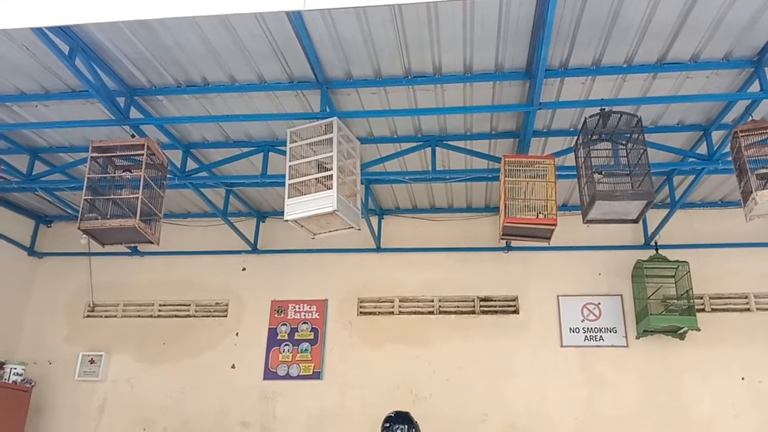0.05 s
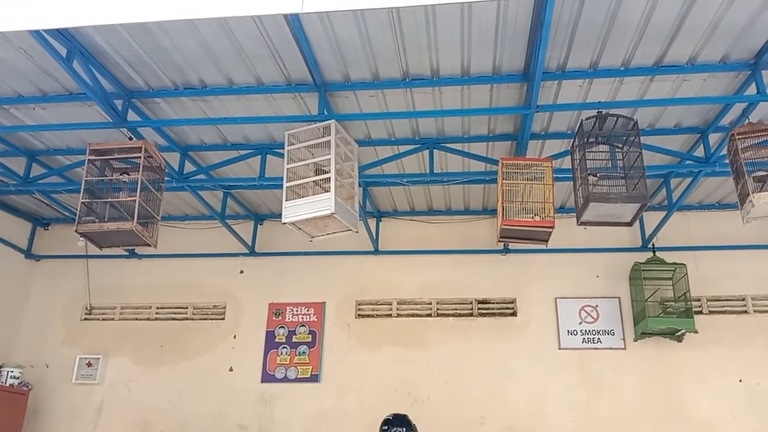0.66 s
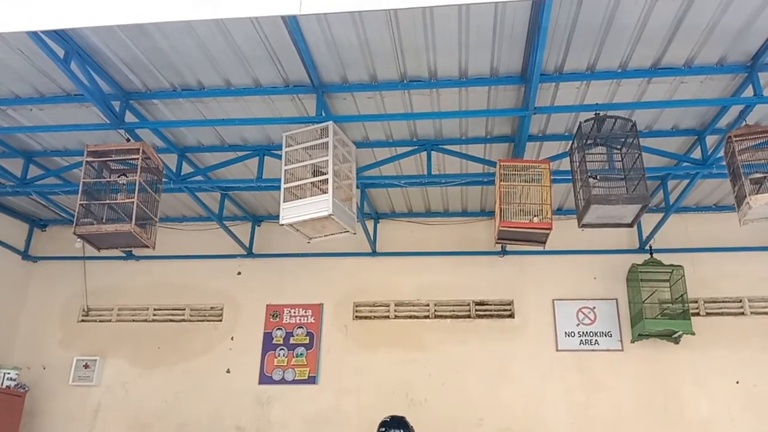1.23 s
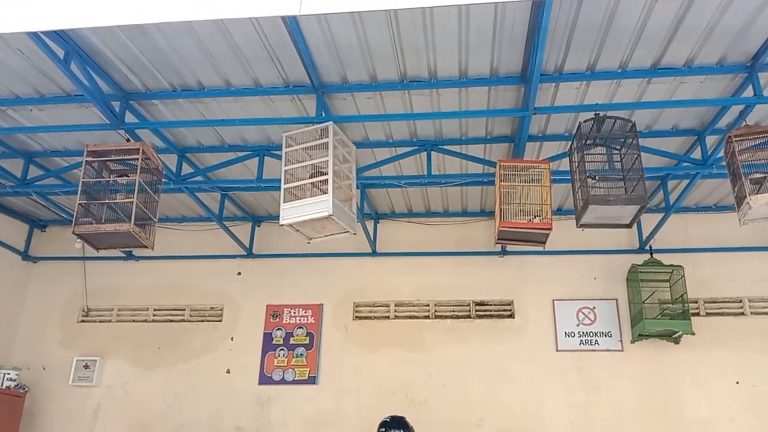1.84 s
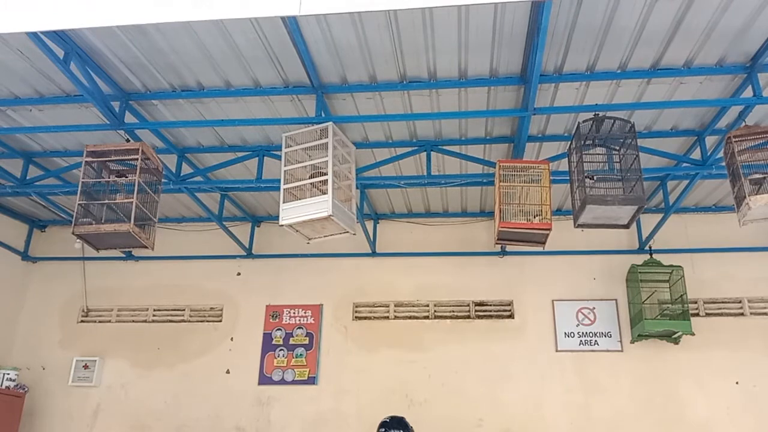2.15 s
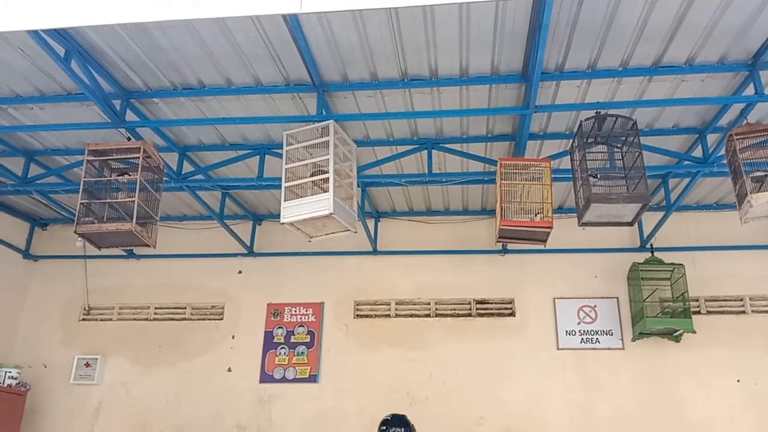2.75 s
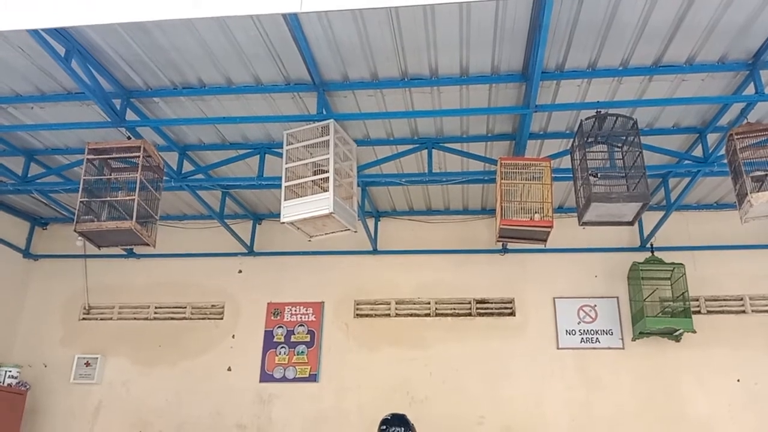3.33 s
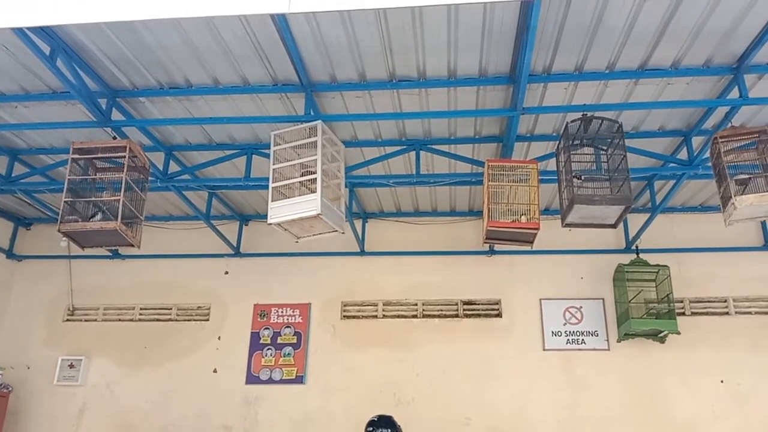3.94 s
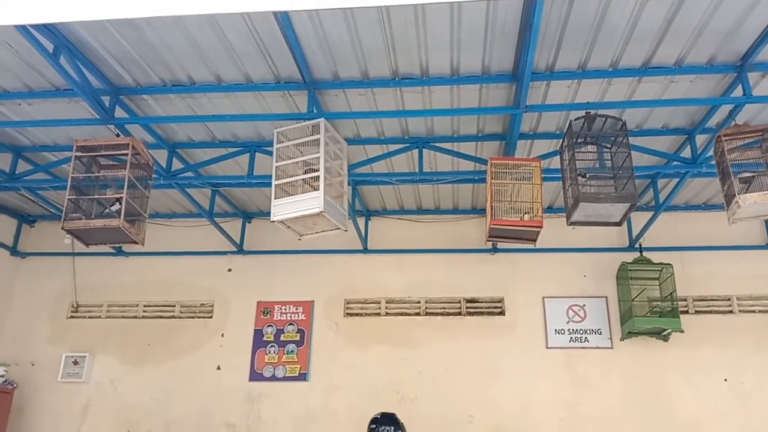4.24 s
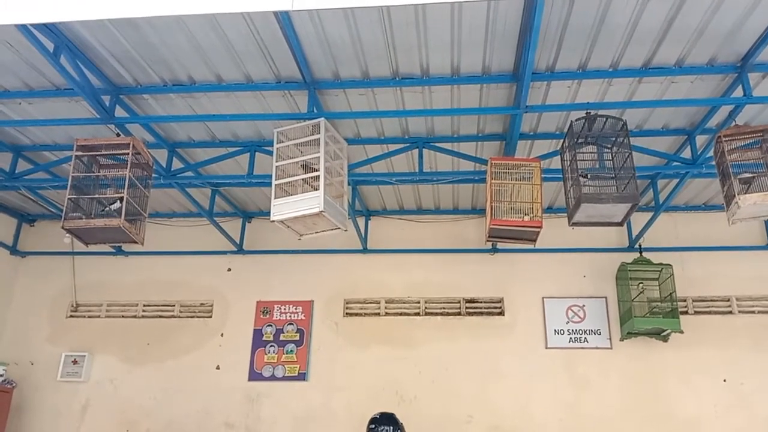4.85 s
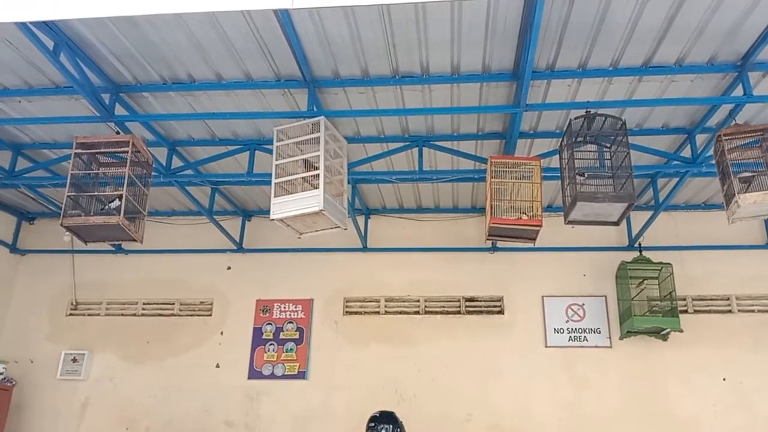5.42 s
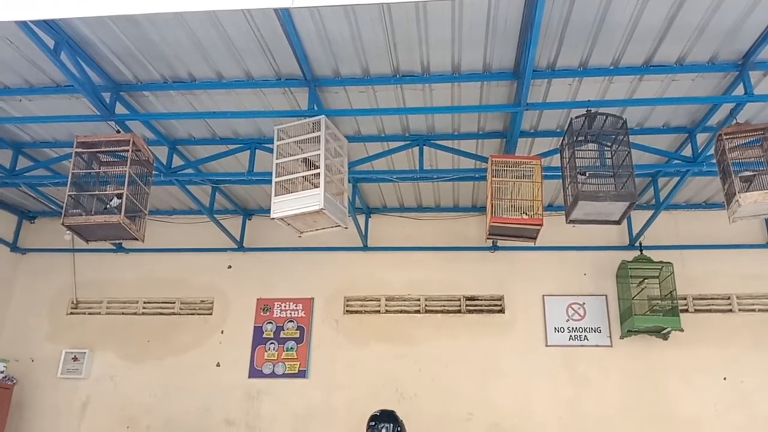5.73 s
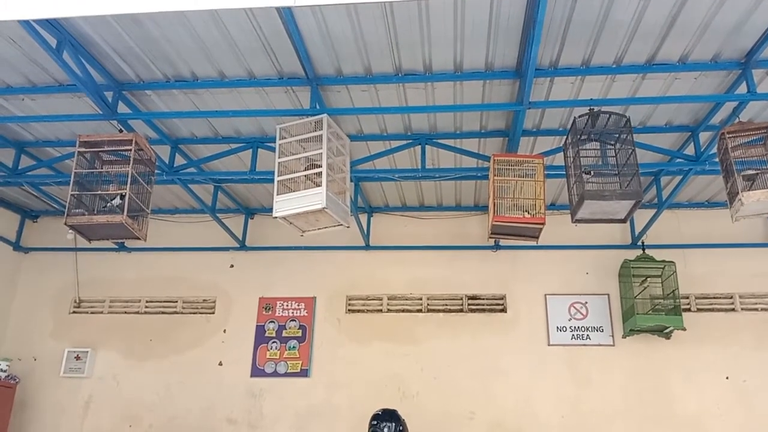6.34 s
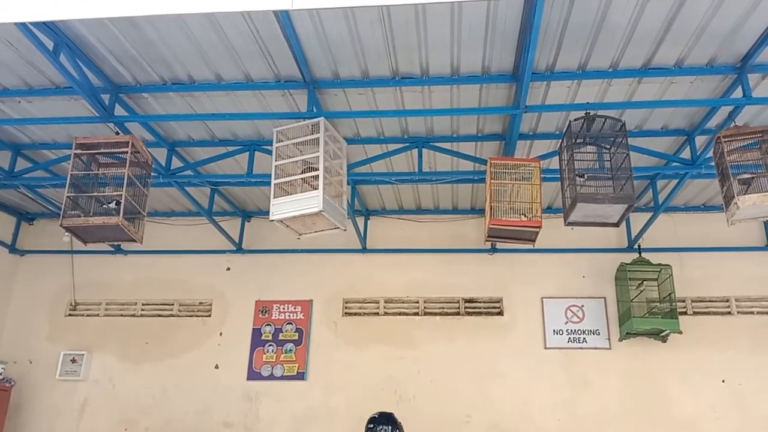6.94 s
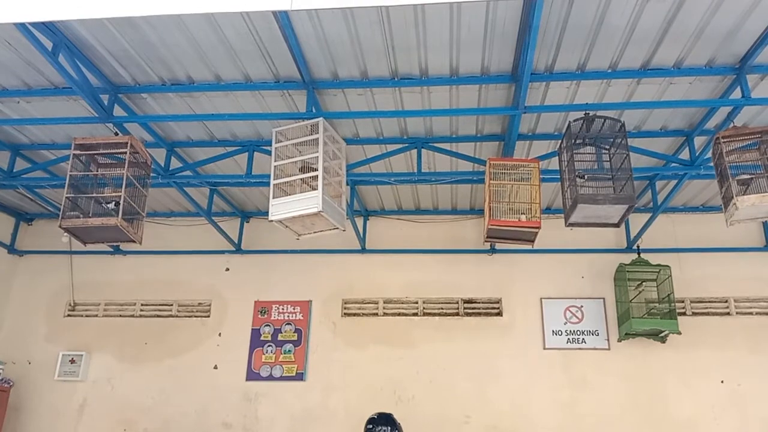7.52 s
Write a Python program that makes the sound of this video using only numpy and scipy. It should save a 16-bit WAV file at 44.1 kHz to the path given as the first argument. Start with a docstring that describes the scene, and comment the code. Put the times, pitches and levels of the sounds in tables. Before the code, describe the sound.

Inside an echoing, metal-roofed shed, a nearby caged bird repeats a short grating rattle that swells into a loud rasp. After five of these calls it lets out a hissing, climbing screech, then rasps twice more and ends on a faint falling squeal. The gaps are very quiet, holding only soft hiss, far chirps, a few light brushes on the cage bars and patches of distant engine hum.

```python
"""A caged songbird scolds near the microphone, in a hard shed that rings under its sheet-metal roof.
From the start a far engine hums in patches through the recorder's noise suppressor, with faint low tones
and chirps. Five calls come first, each a soft churr bursting into a harsh rasp as the membranes of the
syrinx slap. Near 5 s a call breaks into a rising screech. Two more calls follow, the engine slows after
6 s, and a thin squeal falls away at the end. All along, the suppressor turns the gaps down."""
import sys
import numpy as np
from scipy import signal
from scipy.fft import rfft, irfft, next_fast_len
from scipy.io import wavfile
from scipy.ndimage import uniform_filter1d, map_coordinates

SR = 44100
rng = np.random.default_rng(int(sys.argv[2]) if len(sys.argv) > 2 else 0)


def to_wav(sig):
    """Store sig (one row per channel, or 1-D mono) as 16-bit WAV at the path in sys.argv[1].

    Samples outside -1..1 are clipped; the rate is SR.
    """
    pcm = np.clip(np.atleast_2d(sig), -1, 1) * 32767
    pcm = np.round(pcm).astype(np.int16)
    wavfile.write(sys.argv[1], SR, pcm.T)  # frames by channels


N = 338688
T = np.arange(N) / SR

# Background hiss as the noise suppression leaves it. Each row: time in seconds, level in dB.
HISS_LEVEL = [(0, -56.5), (.6, -57), (1.2, -63), (2.1, -61), (2.8, -55.5), (4.9, -60.5), (6.5, -56.5),
              (7.68, -63.5)]
# Spectrum of that hiss. Each row: frequency in Hz, relative level in dB.
HISS_COLOUR = [(100, -32), (400, -33.5), (700, -17), (1400, -13), (2300, -4), (3300, -14.5), (4500, 0.5),
               (6000, 0), (8500, -9), (9700, -22), (12500, -17), (15000, -25.5)]
# Speed of the far engine. Each row: time in seconds, firings per second.
FIRING_RATE = [(0, 42.6), (3, 43.6), (5.6, 44.3), (6.1, 44.6), (6.35, 33.7), (6.57, 38), (6.8, 35.1),
               (7.3, 33.4), (7.68, 34)]
# Its exhaust noise. Each row: frequency in Hz, relative level in dB.
RUMBLE_COLOUR = [(20, -22.5), (45, -8), (78, -4.5), (110, -7.5), (150, -1), (220, -31), (500, -69.5)]
# Its mechanical noise. Each row: frequency in Hz, relative level in dB.
CLATTER_COLOUR = [(120, -43), (230, -4), (300, -3), (380, -4), (480, 0), (680, -4), (1000, -27.5),
                  (2000, -59)]
# The faint bed of engine hum. Each row: time in seconds, gain in dB.
ENGINE_LEVEL = [(0, -62), (.3, -79), (1, -78.5), (2.1, -77.5), (2.8, -69), (4.5, -68), (6.4, -68.5),
                (7.68, -80.5)]
# Patches of hum that the suppressor lets through.
# Each row: middle and length in seconds, pitch and half width in Hz, level in dB.
HUM_PATCHES = [(1.085, 0.048, 160, 50, -66), (1.715, 0.066, 207, 55, -60), (2.31, 0.19, 304, 50, -60.5),
               (2.41, 0.055, 210, 40, -57), (3.066, 0.19, 105, 70, -57), (3.36, .09, 242, 45, -56),
               (3.538, .14, 107, 70.6, -52), (4.16, 0.15, 175, 27.1, -42.5), (4.42, 0.25, 155, 35, -58.5),
               (4.707, 0.071, 306, 69.6, -65), (5.119, 0.13, 173, 27, -43.5), (5.61, 0.24, 175, 27, -42),
               (5.582, .25, 100, 44.7, -60.5), (5.672, 0.097, 284, 70, -60), (5.979, 0.16, 202, 92, -54),
               (6.56, 0.32, 151.4, 35.2, -50), (7.291, 0.17, 101.3, 35, -51.5),
               (7.623, 0.16, 132, 34.7, -59)]
# Far hoots and the near bird's undertones. Each row: start and length in seconds, pitch in Hz, level in dB.
LOW_TONES = [(1.307, 0.49, 977, -62.5), (2.04, 0.72, 431, -67), (2.37, 0.44, 884, -64),
             (3.47, 0.3, 552, -68.5), (5.24, 0.42, 685, -61), (5.419, 0.35, 469, -62),
             (6.387, 0.18, 514, -58), (6.42, 0.31, 706, -68.5), (7.479, 0.21, 503, -59.5)]
# Ring of the shed. Each row: frequency in Hz, seconds to fall by 60 dB.
SHED_T60 = [(200, 1), (1000, 0.66), (2500, 0.64), (5000, 0.65), (8000, 0.61), (13000, 0.56)]
# Standing waves under the roof. Each row: frequency in Hz, gain in dB.
STANDING_WAVES = [(1770, 2), (2070, 1.5), (2350, 2.5), (2520, 1), (2663, 0), (3110, 2.5), (3300, 2),
                  (3420, 2), (4140, 1.5), (4000, -3.5), (4660, 4), (4680, 3.5), (4970, 7), (5215, 5),
                  (6926, 6.5), (7139, 2), (7700, 6)]
# Other birds down the shed. Each row: start and length in seconds, pitch in Hz, level in dB.
CHIRPS = [(.3, 0.1, 2300, -60.5), (1.17, 0.11, 2380, -62.5), (2.85, 0.1, 2450, -55.5),
          (3.66, 0.04, 3200, -51.5), (6.52, 0.051, 1965, -53.5), (6.61, 0.069, 2820, -57.5),
          (6.74, 0.068, 4110, -63), (6.91, 0.041, 3140, -57.5)]
# Brushes on the cage bars. Each row: start in seconds, level in dB, seconds to fall by 60 dB.
SCUFFS = [(2.35, -53.5, 0.091), (3.472, -47.5, .14), (3.55, -61.5, .08), (4.698, -51.5, 0.19)]
# Spectrum of a brush. Each row: frequency in Hz, relative level in dB.
SCUFF_COLOUR = [(900, -37), (2500, -11.5), (8000, 6), (9700, -10), (12500, -2.5), (15000, -13.5)]
# The screech. Each row: time in seconds, hiss level in dB, whistle pitch in Hz, whistle level in dB.
SCREECH = [(4.972, -73, 1139, -88), (4.987, -43.5, 1170, -56.5), (5.08, -35.5, 1395, -45.5),
           (5.16, -30.5, 1912, -41.5), (5.23, -26.5, 2261, -26.5), (5.275, -25, 2091, -43),
           (5.305, -41, 1906, -50), (5.35, -89, 1900, -87.5)]
# Spectrum of its hiss. Each row: frequency in Hz, relative level in dB.
SCREECH_COLOUR = [(300, -90.5), (700, -24.5), (1050, -37.5), (1400, -6.5), (2200, -2), (3300, -3.5),
                  (4500, 0), (5800, -7), (7800, -7), (8700, -13.5), (9500, -32), (12500, -24.5),
                  (15500, -39)]
# The closing squeal. Each row: time in seconds, pitch in Hz, level in dB.
SQUEAL = [(7.55, 2177, -70), (7.6, 1992, -46.5), (7.65, 1644, -64.5), (7.68, 1550, -70)]
# The two partials that open a churr. Each row: frequency in Hz, relative level in dB.
CHIP_PARTIALS = [(2550, -7.5), (4500, -9.5)]
# Throat and beak resonances, beak nearly closed. Each row: centre and width in Hz, gain in dB.
CHURR_THROAT = [(706, 87, -17), (1410, 141, -7), (2082, 336, -4), (2680, 830, -7), (3626, 140, -5),
                (4507, 620, -1), (4740, 210, -1), (5360, 880, -7), (6630, 1500, -16), (8360, 630, -22),
                (10600, 1300, -35.5)]
# The same with the beak open. Each row: centre and width in Hz, gain in dB.
RASP_THROAT = [(806, 135, -22), (1583, 253, -9.5), (2553, 537, 2.5), (3193, 590, -0.5), (4366, 610, 3),
               (4810, 510, -1), (5060, 220, -3), (5760, 880, -7), (6894, 1080, -4.5), (8300, 440, -17),
               (10200, 1400, -30.5), (11540, 1000, -22)]
# The near bird's calls. Each row: start and delay to the rasp in seconds, churr level in dB, then the
# rasp's swell in dB, fade in seconds, level in dB, resonance scale and tilt in dB per octave.
SCOLDS = [(0.642, 0.18, -40.5, 10, 0.042, -27.5, .97, -0.8), (1.356, 0.21, -40, 7, 0.0484, -23.5, 1, 1.4),
          (2.128, .2, -39, 12, 0.079, -25.5, .99, 1), (2.959, 0.21, -38.5, 8, 0.055, -22.5, 1.002, 0.4),
          (3.811, .21, -39.5, 11, 0.072, -23, 1.01, 0.5), (5.906, 0.22, -37.5, 10, 0.0752, -24, 1, 1),
          (7.035, 0.21, -38.5, 11.5, 0.053, -25.5, 0.98, 0.7)]

THROB_DB, DRONE_DB, BUZZ_DB = -3, -2.5, -4  # the engine's low, middle and upper orders
CHATTER_HZ, CHATTER_OCTAVES, CHATTER_DB, CHATTER_S = 2850, 0.97, -65.5, 0.023
CHURR_OVERLAP_S, RASP_SWELL_S = 0.054, .094
CHURR_SCALE, CHURR_DRIFT_PER_S = 1.0136, -0.0039  # its resonances sink slightly from call to call
UNDERTONE_HZ, UNDERTONE_RISE_HZ_PER_S, UNDERTONE_DB = 719, 1800, -35  # a weak glide under each rasp


def amp(db):
    """Decibels to gain."""
    return 10 ** (np.asarray(db) / 20)


def unit(x):
    """Scale to rms 1."""
    return x / np.sqrt(np.mean(x ** 2) + 1e-20)


def along(points, hz):
    """Read (Hz, value) points on a log frequency axis."""
    knots_hz, values = np.transpose(points)
    return np.interp(np.log(hz + 1), np.log(knots_hz + 1), values)


def curves(rows):
    """One value per sample for each column after the time."""
    times, *columns = np.transpose(rows)
    return [np.interp(T, times, column) for column in columns]


def wobble(rate, size=N):
    """A smooth random curve, rate knots a second."""
    knots = rng.standard_normal(int(size * rate / SR) + 4)
    return map_coordinates(knots, [np.arange(size) * rate / SR])


def filtered(x, response):
    """Filter x by a gain given as a function of Hz."""
    size = next_fast_len(len(x) + 8192)
    return irfft(rfft(x, size) * response(np.fft.rfftfreq(size, 1 / SR)), size)[:len(x)]


def noise(colour, size=N):
    """Noise of rms 1 with a spectrum of (Hz, dB) points."""
    return unit(filtered(rng.standard_normal(size), lambda hz: amp(along(colour, hz))))


def add(track, start, sound):
    """Mix a sound into the track at start seconds."""
    part = track[round(start * SR):][:len(sound)]
    part += sound[:len(part)]


def resonances(modes, hz):
    """Gain of steep-sided resonances."""
    return np.sqrt(sum(amp(db) ** 2 / (1 + ((hz - f) / width) ** 2) ** 4 for f, width, db in modes))


def stretched(x, scale):
    """Move all frequencies by a scale that changes with time."""
    return map_coordinates(x, [np.cumsum(scale)], order=5, mode="mirror")


def hoarse_tone(hz, rough):
    """A whistle on the pitch curve hz that trembles fast and at random."""
    pitch = hz * (1 + rough * wobble(np.mean(hz) / 4, len(hz)))
    return np.sqrt(2) * np.sin(2 * np.pi * np.cumsum(pitch) / SR)


def note(hz, length, rough):
    """A hoarse tone that swells and fades."""
    swell = np.sin(np.linspace(0, np.pi, int(length * SR)))
    return swell * hoarse_tone(np.full(len(swell), hz), rough)


def notes(rows, rough):
    """A track of notes. Each row: start and length in seconds, pitch in Hz, level in dB."""
    out = np.zeros(N)
    for start, length, hz, db in rows:
        add(out, start, amp(db) * note(hz, length, rough))
    return out


def background_hiss():
    """Faint background hiss, rising and falling with the recorder's noise suppression."""
    hiss_db, = curves(HISS_LEVEL)
    return noise(HISS_COLOUR) * amp(hiss_db + wobble(7.2))


def engine(drone_hz=178, drone_width_hz=22, rumble_db=-7, clatter_db=-7):
    """Orders of the firing rate over exhaust noise; the one nearest the shed's low resonance drones."""
    firing_hz, = curves(FIRING_RATE)
    phase = 2 * np.pi * np.cumsum(firing_hz * (1 + .008 * wobble(11))) / SR
    throb, drone, buzz = np.zeros((3, N))
    for order in range(2, 9):
        tone = np.sin(order * phase + .5 * wobble(13) + rng.uniform(0, 2 * np.pi))
        hz = order * firing_hz
        drone += tone * np.exp(-((hz - drone_hz) / drone_width_hz) ** 2)
        throb += tone * amp(4.6 * wobble(15)) * np.interp(hz, [72.4, 89.5, 151.2, 162.5], [.18, .86, .87, 0])
        buzz += tone * amp(5.4 * wobble(8.8)) * np.interp(hz, [187, 198, 308, 348], [0, 1, .31, .11])
    low = unit(throb) + amp(rumble_db) * noise(RUMBLE_COLOUR)
    upper = unit(buzz) + amp(clatter_db) * noise(CLATTER_COLOUR)
    return amp(THROB_DB) * low + amp(DRONE_DB) * unit(drone) + amp(BUZZ_DB) * upper


def far_engine(waver_db=4, patch_flatness=2.1):
    """Far engine hum: a faint wavering bed, and brief patches heard through the noise suppressor."""
    sound = engine()
    level_db, = curves(ENGINE_LEVEL)
    out = amp(level_db + waver_db * wobble(27)) * sound
    for middle, length, centre_hz, width_hz, db in HUM_PATCHES:
        span = np.abs(T - middle) < 2 * length
        band = filtered(sound[span], lambda hz: resonances([(centre_hz, width_hz, 0)], hz))
        bell = np.exp(-np.abs(2 * (T[span] - middle) / length) ** patch_flatness)
        out[span] += amp(db) * bell * band / np.sqrt(np.average(band ** 2, weights=bell))
    return out


def low_tones(waver_db=4):
    """Faint wavering low tones: far hoots and the near bird's undertones."""
    return notes(LOW_TONES, rough=0.04) * amp(waver_db * wobble(22))


def shed_response(direct_db):
    """From cage to microphone: the direct sound and a dense tail whose treble dies first."""
    hz, t, spectra = signal.stft(rng.standard_normal(SR * 3 // 4), SR, nperseg=256)
    decay = amp(-60 * t / along(SHED_T60, hz)[:, None])
    tail = signal.istft(spectra * decay, SR, nperseg=256)[1]
    tail *= np.clip(T[:len(tail)] / .003, 0, 1)
    tail /= np.linalg.norm(tail)
    tail[0] += amp(direct_db)
    return tail / np.linalg.norm(tail)


def shed(x, mode_width_hz=13, block=SR // 3, overlap=SR // 50):
    """The shed's diffuse echo, drawn afresh for each block; the standing waves stay."""
    wet = np.zeros(N)
    ramp = np.sin(np.linspace(0, np.pi / 2, overlap)) ** 2
    window = np.concatenate([ramp, np.ones(block - overlap), ramp[::-1]])
    for start in range(0, N, block):
        part = x[start:start + len(window)]
        add(wet, start / SR, signal.fftconvolve(part * window[:len(part)], shed_response(direct_db=-6.5)))
    return filtered(wet, lambda hz: 1 + sum(
        (amp(db) - 1) / (1 + 1j * (hz - f) / mode_width_hz) for f, db in STANDING_WAVES))


def neighbours(count=26):
    """Birds farther down the shed: a few clear chirps over faint, evenly scattered chatter."""
    when, pitch, loud = rng.random((count, 3)).T
    starts = (np.arange(count) + when) * N / SR / count
    hz = CHATTER_HZ * 2 ** (CHATTER_OCTAVES * (pitch - .5))
    chatter = zip(starts, np.full(count, CHATTER_S), hz, CHATTER_DB + 8 * (loud - .5))
    return notes(CHIRPS, rough=0.062) + notes(chatter, rough=0.067)


def scuffs():
    """The near bird's feet and wings brush the bars in short bright bursts."""
    out, t = np.zeros(N), T[:SR // 4]
    for start, db, t60 in SCUFFS:
        add(out, start, noise(SCUFF_COLOUR, len(t)) * amp(db - 60 * t / t60))
    return out


def syrinx(slap_hz, jitter, air_share, size):
    """Membranes slap at an uneven rate; each slap lets a puff of turbulent air through."""
    cycles = np.cumsum(slap_hz * np.exp(jitter * wobble(slap_hz, size))) / SR
    slaps = np.diff(np.floor(cycles), prepend=0) * amp(1.7 * wobble(slap_hz, size))
    puffs = np.exp(-3 * (cycles % 1)) * rng.standard_normal(size)
    return np.sqrt(1 - air_share) * unit(slaps) + np.sqrt(air_share) * unit(puffs)


def squeal():
    """A thin, hoarse whistle that falls in pitch."""
    hz, db = curves(SQUEAL)
    return (T > SQUEAL[0][0]) * amp(db) * hoarse_tone(hz, rough=0.067)


def screech():
    """A wide hiss from the syrinx with a hoarse whistle climbing through it."""
    hiss_db, whistle_hz, whistle_db = curves(SCREECH)
    source = syrinx(slap_hz=420, jitter=.35, air_share=.55, size=N)
    hiss = unit(filtered(source, lambda hz: amp(along(SCREECH_COLOUR, hz))))
    sounding = (T > SCREECH[0][0]) & (T < SCREECH[-1][0])
    return sounding * (amp(hiss_db) * hiss + amp(whistle_db) * hoarse_tone(whistle_hz, rough=0.0688))


def churr(length, scale, chip_db=0, attack_s=0.05, release_s=0.025, sag_db_per_s=-8):
    """A brief chip, then a soft grating rattle through a nearly closed beak."""
    t = T[:SR // 2]
    source = syrinx(slap_hz=230, jitter=.3, air_share=.35, size=len(t))
    voice = unit(filtered(source, lambda hz: resonances(CHURR_THROAT, hz / scale)))
    envelope = np.clip(t / attack_s, 0, 1) ** 1.2 * np.clip((length - t) / release_s + 1, 0, 1)
    out = amp(sag_db_per_s * t) * envelope * voice
    for hz, db in CHIP_PARTIALS:
        add(out, 0, amp(chip_db + db) * note(hz, length=0.04, rough=0.078))
    return out


def rasp(fade_s, scale, tilt_db=-0.14, swell_db=11, fade_db=16, opening=.09, overshoot=0.0309):
    """The beak opens and the bird pushes hard: level, brightness and resonances rise together."""
    t = T[:SR // 3]
    source = syrinx(slap_hz=440, jitter=.27, air_share=.23, size=len(t))
    tilt = lambda hz: amp(tilt_db * np.log2((hz + 100) / 3500))
    voice = unit(filtered(source, lambda hz: resonances(RASP_THROAT, hz) * tilt(hz)))
    slack = 1 - np.clip(t / RASP_SWELL_S, 0, 1)
    spent = np.maximum(t - RASP_SWELL_S, 0) / fade_s
    climb = scale * (1 + overshoot * np.minimum(spent, 1))  # the resonances climb on as it fades
    treble = filtered(voice, lambda hz: np.clip((hz - 5400) / 800, 0, 1))
    # the upper resonances follow the beak; the lower ones belong to the windpipe and move less
    beak = stretched(treble, climb * (1 + opening * (.27 - slack))) * amp(-7 * slack)
    windpipe = stretched(voice - treble, climb * (1 + opening / 2 * (.2 - slack)))
    undertone = amp(UNDERTONE_DB) * hoarse_tone(UNDERTONE_HZ + UNDERTONE_RISE_HZ_PER_S * t, rough=0.031)
    level_db = -swell_db * slack ** 1.86 - fade_db * spent ** 2.42
    flutter_db = 1.07 * wobble(127.3, len(t))
    return amp(level_db + flutter_db) * np.clip(t / 0.022, 0, 1) * (windpipe + beak + undertone)


def scolding():
    """The bird near the microphone: in each full call the churr runs on into the rasp."""
    out = np.zeros(N)
    for start, delay, churr_db, swell_db, fade_s, rasp_db, scale, tilt_db in SCOLDS:
        churr_scale = CHURR_SCALE + CHURR_DRIFT_PER_S * start
        add(out, start, amp(churr_db) * churr(delay + CHURR_OVERLAP_S, churr_scale))
        add(out, start + delay, amp(rasp_db) * rasp(fade_s, scale, tilt_db, swell_db))
    add(out, 4.529, amp(-38) * churr(length=0.23, scale=0.97, chip_db=3.5))  # breaks off before the screech
    add(out, 5.374, amp(-24) * rasp(fade_s=0.042, scale=1.01))  # follows the screech
    return out


def scene():
    """One microphone in the shed: the birds ring under the roof, over a faint background."""
    indoors = scolding() + screech() + squeal() + neighbours() + scuffs()
    return (shed(indoors) + low_tones() + far_engine() + background_hiss())[None]


def suppressor(x, threshold_db=-86, tilt_db=-3, depth_db=-12, gate_db=-73, split_hz=600):
    """The recorder turns down each weak treble band, and everything once a call has died away."""
    hz, _, spectra = signal.stft(x, SR, nperseg=512)
    power = uniform_filter1d(np.abs(spectra) ** 2, size=3, axis=0)
    power = np.abs(uniform_filter1d(power, size=5, axis=1))
    threshold = amp(threshold_db + tilt_db * np.log2((hz[:, None] + 100) / 3000))
    band_gain = np.maximum(power / (power + threshold ** 2), amp(depth_db))
    call_db = 10 * np.log10(power[(hz > 1500) & (hz < 8000)].mean(axis=0) + 1e-20)
    shut = np.clip(.5 + (gate_db - call_db) / 10, 0, 1)
    treble_gain, bass_gain = band_gain * amp(-11 * shut), amp(-12 * shut)
    gain = np.where(hz[:, None] > split_hz, treble_gain, bass_gain)
    return signal.istft(spectra * gain, SR, nperseg=512)[1][:N]


def record(dry):
    """The recorder suppresses noise and passes nothing above 15.5 kHz."""
    return filtered(suppressor(dry[0]), lambda hz: hz < 15500)[None]


dry = scene()
out = record(dry)
to_wav(out)
```